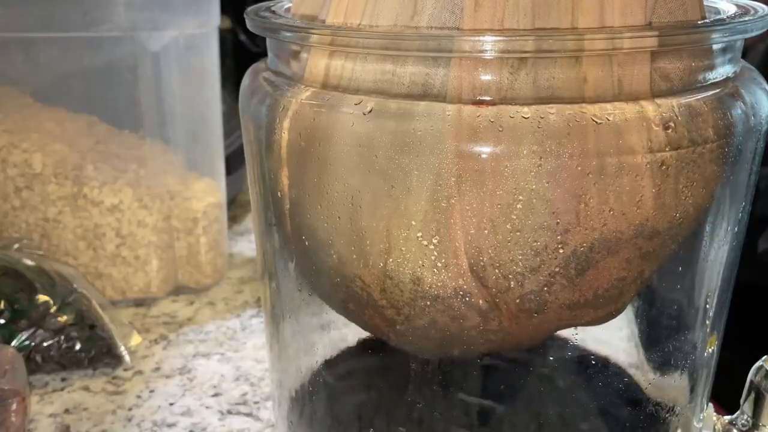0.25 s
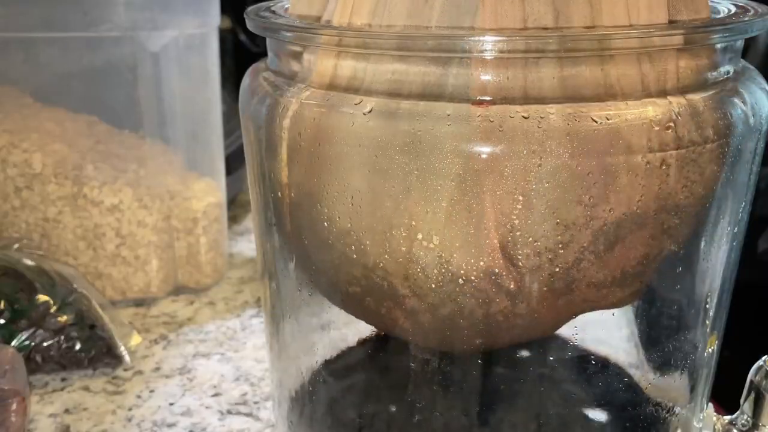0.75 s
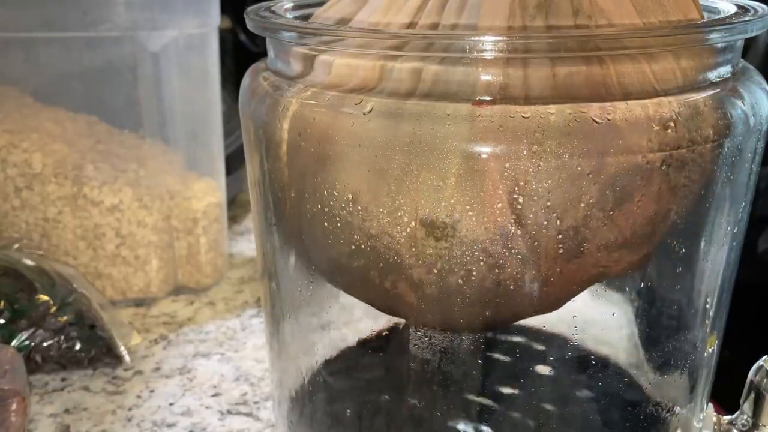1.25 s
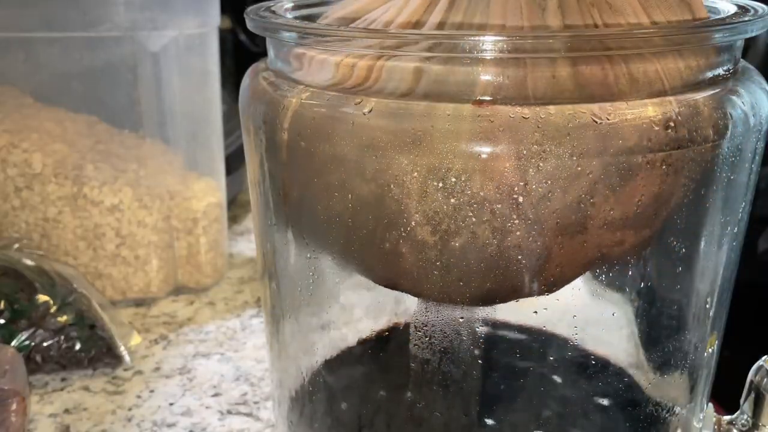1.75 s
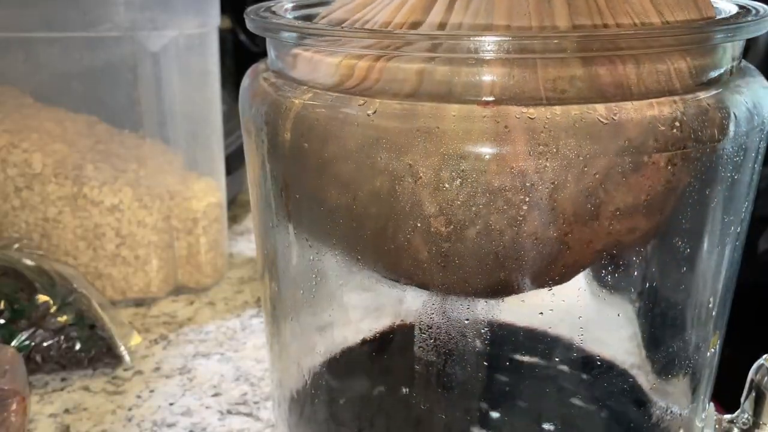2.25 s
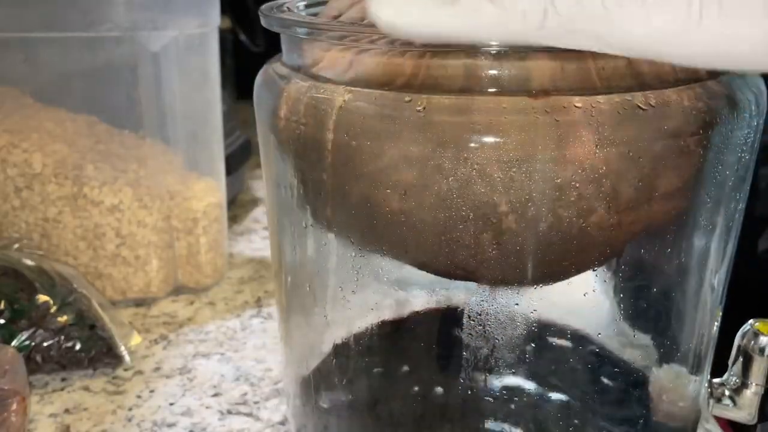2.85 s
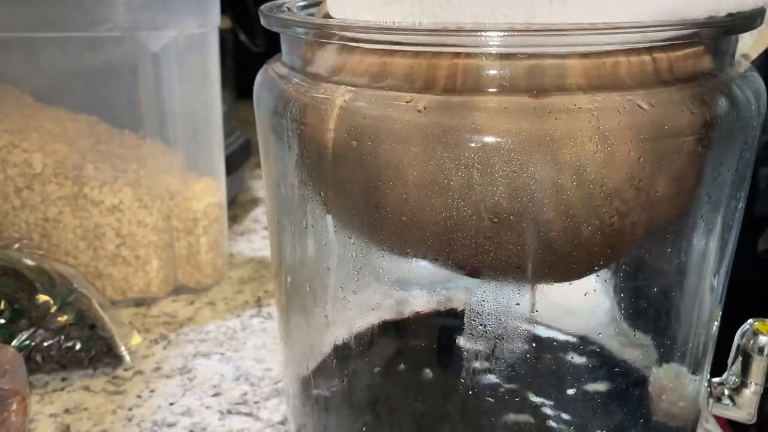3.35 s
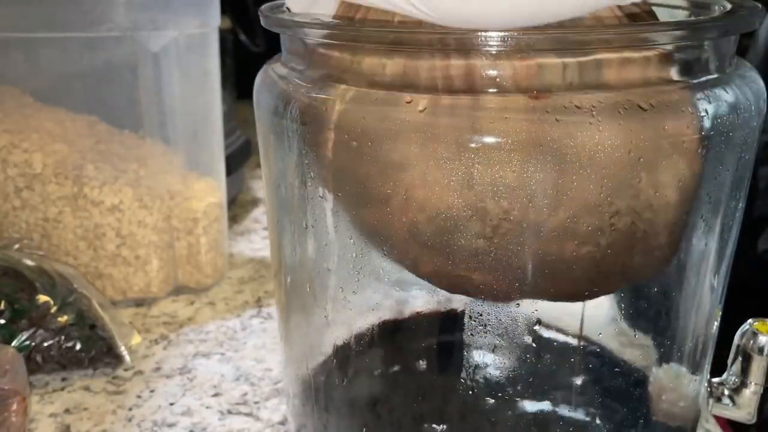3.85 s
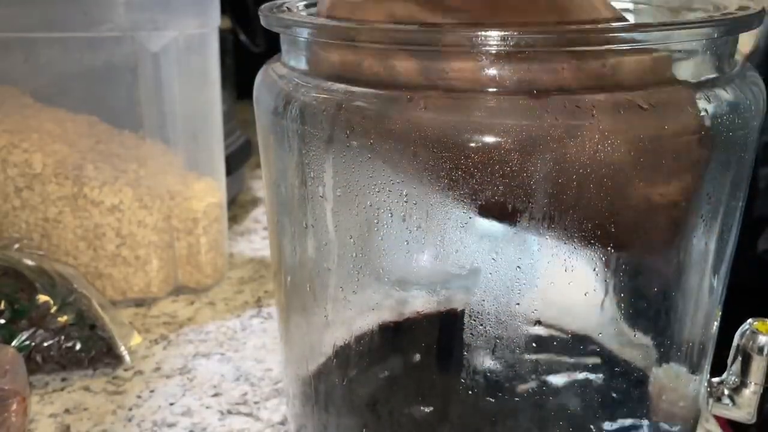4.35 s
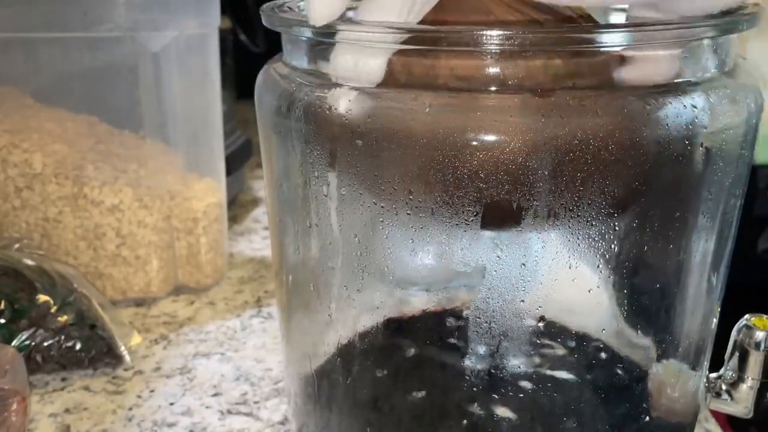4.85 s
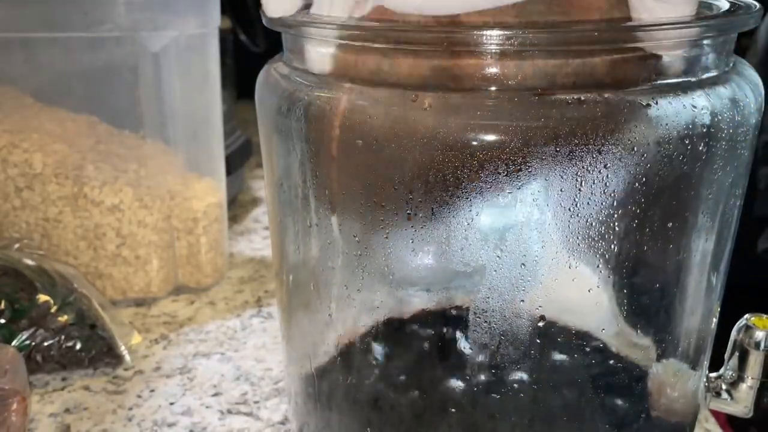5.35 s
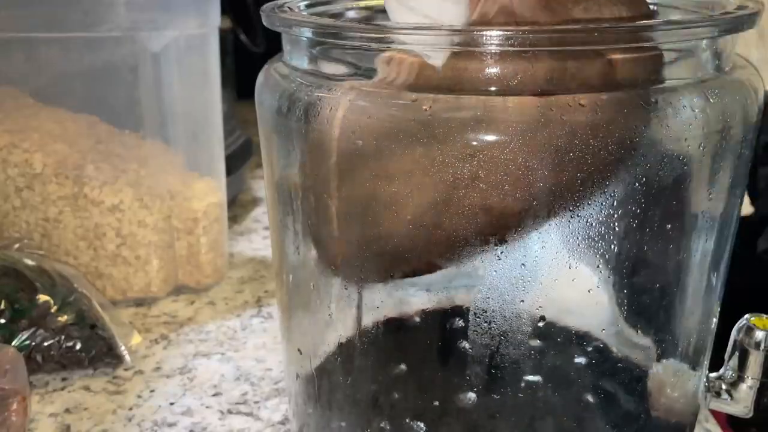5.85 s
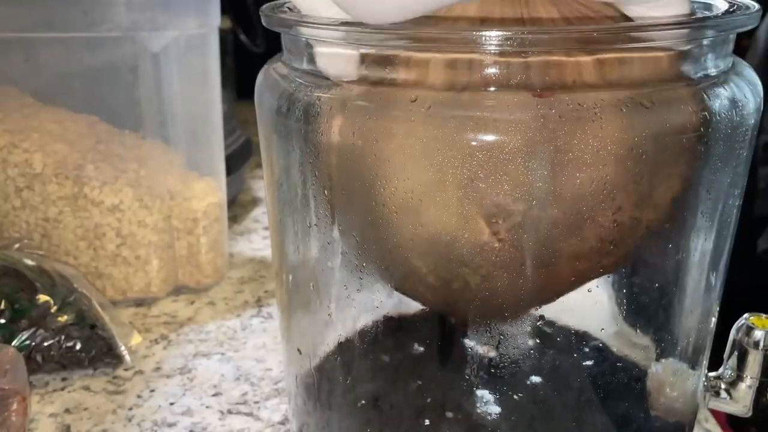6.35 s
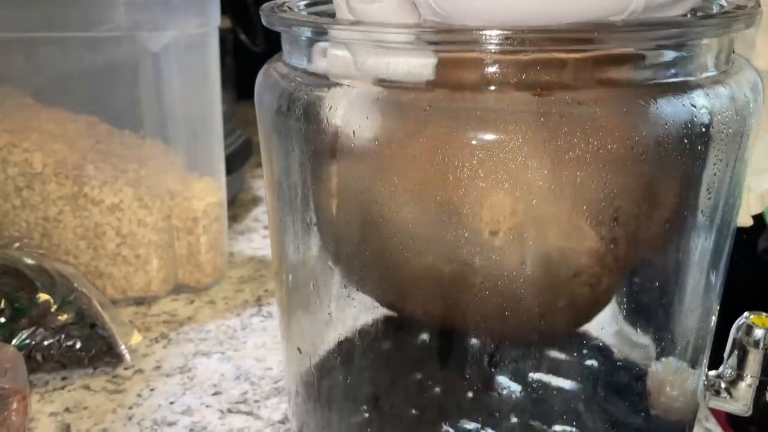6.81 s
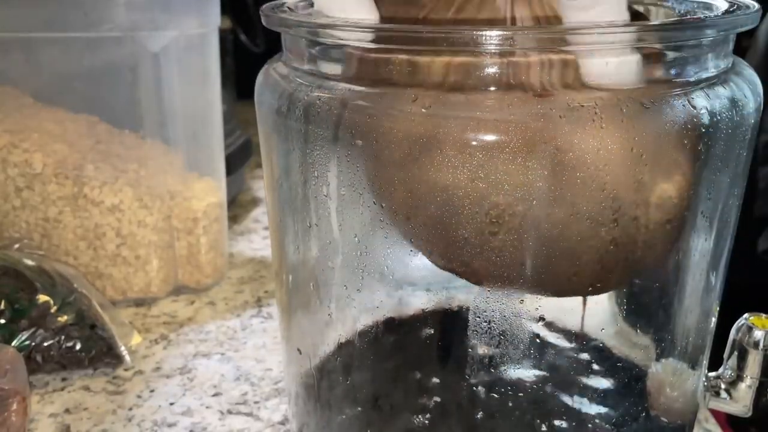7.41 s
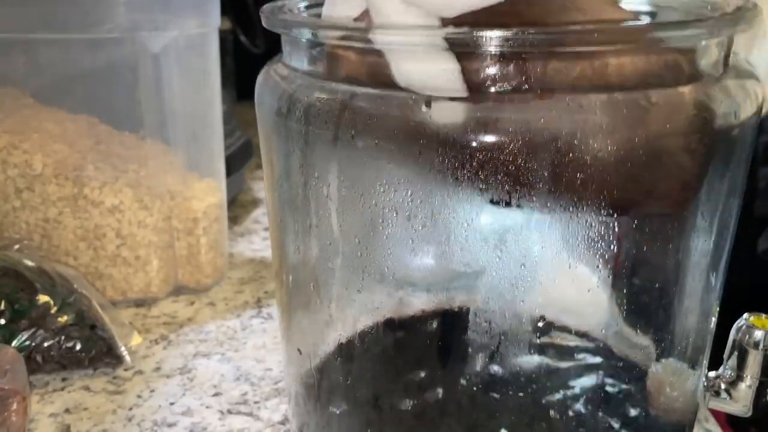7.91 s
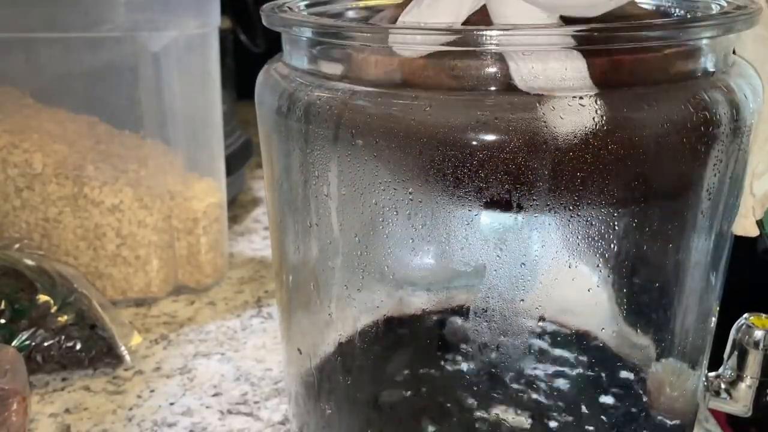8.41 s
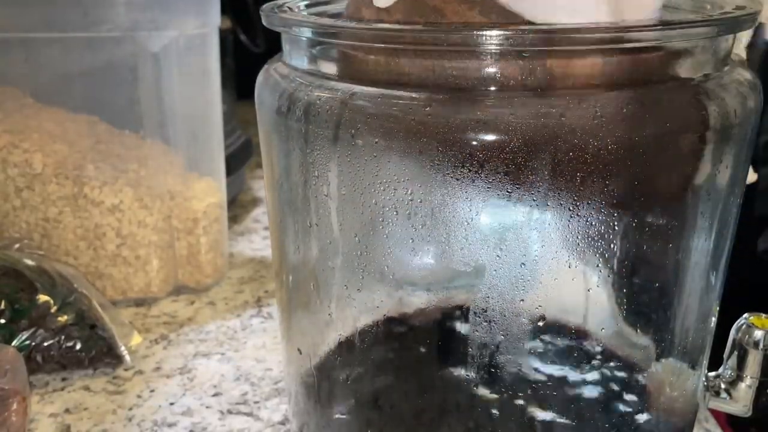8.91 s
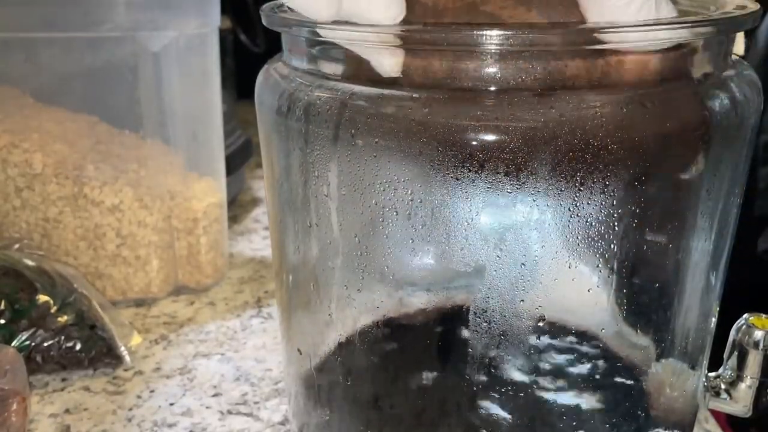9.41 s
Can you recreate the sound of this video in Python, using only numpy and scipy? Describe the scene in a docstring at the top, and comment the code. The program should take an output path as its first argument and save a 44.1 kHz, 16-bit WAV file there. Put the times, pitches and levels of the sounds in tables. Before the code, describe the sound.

Over a low, faint room hum, watery drops ring with short hollow plips inside a jar. A hard knock with a gritty rattle comes early and is by far the loudest event. Light dripping follows, then busier trickling as gloved hands handle the wet bag, with dry rustles, little crackling snaps and dull low thumps, heard close up in a small kitchen.

```python
"""Drops fall from a wet filter bag, lifted and turned by gloved hands in the neck of a glass jar.
They sound in the pool below as ringing sines, higher companion tones and high splats, each with tick and spray.
Small drops splat and fizz, and the jar's air rings after them. The jar knocks once on the counter as clicked
modes; cloth and gloves rustle and snap in filtered noise, hands bump the jar in sagging low sines, and
noise bands and soft hums make a quiet kitchen."""
import sys
import numpy as np
from scipy import signal
from scipy.io import wavfile

SR = 44100
rng = np.random.default_rng(int(sys.argv[2]) if len(sys.argv) > 2 else 0)


def transcribe(u):
    """Save the signal u as a 16-bit wav file named by the first command-line argument.

    u: samples, shape (n,) or (channels, n), limited to [-1, 1]; the rate is SR.
    q: integer samples, one column per channel.
    """
    v = np.clip(np.atleast_2d(u).T, -1, 1)
    q = np.round(v * 32767).astype(np.int16)
    wavfile.write(sys.argv[1], SR, q)


N = 426447

# In all tables and settings, t60 is the time in seconds for a sound to fade by 60 dB.
# kitchen noise by pitch, only its shape matters: f/Hz, level per Hz/dB
ROOM_SPECTRUM = [(20, -26), (40, -7.5), (65, -3), (134, -1.5), (220, -6.5), (300, -13), (450, -21),
                 (520, -25.5), (800, -31), (1200, -32.5), (2000, -43)]
# low rumble of handling, carried by the counter: t/s, level/dB
RUMBLE_LEVELS = [(0, -62.5), (3.2, -63), (3.69, -58.5), (5.01, -65), (6.6, -56.5), (6.97, -56),
                 (8.81, -65.5), (9.67, -64.5)]
# narrow hums of the kitchen: f/Hz, width/Hz, level/dB
KITCHEN_HUMS = [(416, 32, -70), (800, 94, -78.5)]
# ringing drops, their higher companion tones and high splats: t/s, level/dB, f/Hz,
# t60/s (at least 0.008 s is used)
DROP_TONES = [(0.026, -62.5, 1830, 0.011), (0.096, -61, 1435, .035), (.316, -59.5, 1870, 0.016),
              (.325, -73, 3200, 0.098), (0.693, -52, 1300, 0.061), (0.868, -55.5, 1980, 0.026),
              (.988, -47, 1980, 0.033), (1.087, -63, 1900, .033), (1.129, -66, 1800, 0.035),
              (1.227, -55.5, 2578, 0.022), (1.404, -58.5, 1106, 0.11), (1.512, -57.5, 1830, 0.033),
              (1.54, -44, 1570, 0.17), (1.566, -57, 1280, 0.041), (1.762, -61, 1100, 0.06),
              (1.811, -64.5, 1772, 0.19), (1.886, -56.5, 1080, 0.048), (2.033, -49.5, 1315, .062),
              (2.035, -52.5, 1850, .03), (2.113, -50.5, 1724, .027), (2.143, -57.5, 1910, 0.026),
              (2.215, -42, 1180, 0.0072), (2.213, -53, 3500, .02), (2.238, -54.5, 920, .044),
              (2.354, -55, 4140, 0.022), (2.458, -45, 1076, 0.091), (2.515, -45.5, 1570, 0.022),
              (2.602, -56, 1860, 0.018), (2.675, -53, 1810, 0.015), (2.703, -54.5, 4660, .02),
              (2.839, -60, 1830, 0.018), (2.875, -60.5, 3150, .03), (3.077, -47.5, 1460, 0.028),
              (3.136, -57, 4740, 0.024), (3.174, -55, 2530, 0.0072), (3.238, -46, 720, 0.056),
              (3.243, -56, 4030, .02), (3.311, -51.5, 1050, 0.019), (3.355, -49.5, 1120, 0.052),
              (3.439, -44, 1450, 0.083), (3.509, -53, 1610, 0.11), (3.61, -63.5, 1786, 0.035),
              (3.872, -54, 3110, 0.037), (3.927, -46, 2560, 0.011), (4.057, -58, 2000, 0.011),
              (4.333, -47, 1480, 0.011), (4.489, -53, 3600, 0.037), (4.561, -53, 2600, 0.028),
              (4.684, -46, 1645, 0.045), (4.737, -48, 1646, .054), (4.746, -48, 1230, 0.033),
              (4.764, -44.5, 930, 0.091), (4.824, -47, 2190, 0.018), (4.825, -43.5, 1610, 0.064),
              (4.86, -38.5, 2540, 0.0075), (4.879, -44.5, 1627, .12), (4.908, -45, 930, 0.015),
              (5.018, -47, 1660, 0.024), (5.031, -50.5, 1830, 0.012), (5.048, -51, 3800, 0.017),
              (5.06, -49, 2640, 0.054), (5.061, -51, 3070, 0.088), (5.106, -49, 1530, 0.038),
              (5.163, -38, 876, 0.02), (5.166, -50.5, 1940, 0.033), (5.216, -56.5, 1060, .033),
              (5.329, -55, 1610, 0.018), (5.349, -39.5, 2000, 0.0084), (5.361, -51, 4400, .015),
              (5.424, -60.5, 1930, .03), (5.457, -58, 3096, 0.076), (5.47, -46.5, 1670, .061),
              (5.557, -55, 1880, 0.028), (5.686, -63, 3930, .02), (5.691, -53, 1600, .03),
              (5.719, -63, 5200, 0.034), (5.747, -47.5, 1170, 0.065), (5.777, -55, 1050, 0.047),
              (5.9, -54.5, 770, 0.11), (6.006, -46, 1490, .031), (6.032, -41.5, 1680, 0.064),
              (6.094, -36.5, 1534, 0.073), (6.118, -48, 1080, 0.093), (6.24, -47.5, 1187, 0.056),
              (6.516, -47.5, 1175, .052), (6.582, -47, 5000, 0.05), (6.644, -58, 1840, 0.022),
              (6.701, -44, 1310, 0.016), (6.756, -45.5, 1475, 0.038), (6.794, -52, 1150, 0.019),
              (6.824, -51, 1830, 0.021), (6.897, -43.5, 3440, 0.037), (6.91, -46, 800, 0.011),
              (6.993, -52, 870, .012), (7.025, -53, 3190, .02), (7.058, -40, 900, 0.0074),
              (7.096, -50, 800, .25), (7.179, -55, 1210, 0.076), (7.26, -66, 1700, 0.026),
              (7.343, -58, 1830, 0.024), (7.417, -59, 1830, .012), (7.572, -59, 2010, 0.037),
              (7.67, -57.5, 1760, .04), (7.963, -46, 1340, .012), (8.01, -49, 830, .028),
              (8.029, -55, 850, 0.042), (8.047, -47.5, 2680, 0.04), (8.101, -50.5, 1856, 0.039),
              (8.1, -42, 3030, 0.022), (8.112, -42, 4360, .015), (8.121, -46, 5140, .015),
              (8.125, -48, 845, 0.088), (8.17, -39.5, 870, 0.038), (8.177, -47.5, 3540, .02),
              (8.206, -36, 1514, .04), (8.221, -58, 1033, .14), (8.274, -35, 900, 0.0092),
              (8.303, -48.5, 930, 0.13), (8.329, -42, 893, 0.024), (8.388, -43.5, 893, 0.026),
              (8.411, -38.5, 950, 0.06), (8.44, -46, 1060, 0.019), (8.466, -50.5, 1054, 0.066),
              (8.489, -35, 1535, 0.028), (8.537, -37, 1007, 0.024), (8.602, -45, 1680, .049),
              (8.608, -38, 870, 0.016), (8.68, -40.5, 1560, 0.017), (8.694, -50, 2900, .02),
              (8.703, -50.5, 735, 0.056), (8.78, -42, 1670, 0.048), (8.795, -51, 976, 0.043),
              (8.834, -50, 4400, 0.023), (8.84, -68.5, 1800, .05), (8.962, -36.5, 1506, 0.034),
              (9.067, -54, 1680, .03), (9.113, -44, 1830, 0.007), (9.191, -47, 2095, 0.029),
              (9.238, -48, 1440, 0.025), (9.335, -47.5, 1110, 0.033), (9.337, -46, 3140, 0.012),
              (9.494, -61.5, 1830, 0.033), (9.576, -57, 1326, .12), (9.598, -48, 1690, 0.12)]
# resonances of the air in the jar: f/Hz, level relative to JAR_AIR_DB/dB, t60/s
JAR_RESONANCES = [(887.4, -4.5, 0.047), (1050, -5.5, 0.04), (1427, -10, 0.047), (1830, 3, 0.045),
                  (2530, -6.5, 0.071), (3140, -13.5, 0.093), (4230, -16, 0.1), (4540, -25, 0.047)]
# contacts as the jar rocks down on the counter: t/s, blow level/dB, low-pass f/Hz
KNOCK_CONTACTS = [(0.439, -21.5, 1800), (0.4446, -27, 2070), (0.454, -22, 2540), (.4650, -18.5, 3470),
                  (0.469, -17, 1800), (0.475, -19.5, 1160), (.4880, -28, 2260), (0.52, -41, 1210)]
# ringing modes of counter and jar glass: f/Hz, middle level relative to the blow/dB, t60/s
BODY_MODES = [(99, -26, 0.12), (151.3, -20.5, 0.53), (181.4, -4.5, 0.077), (235, -7.5, 0.14),
              (395.3, 1.5, 0.071), (515, -2.5, 0.02), (582, -1.5, 0.07), (605, 2, 0.031),
              (771, -6.5, 0.038), (930, -12.5, .07), (1115, -9.5, 0.092), (1383, -7.5, 0.056),
              (1680, -1.5, 0.021), (1980, -15, 0.0097), (2247, -36, 0.026), (2850, -11, 0.056),
              (3060, -8.5, 0.0091), (3600, -34, 0.042), (4950, -15, 0.058), (6150, -29, 0.038),
              (7900, -22.5, 0.04)]
# strokes of glove and cloth along the rim: start t/s, length/s, dry hiss level/dB, wet scuff level/dB
RUB_STROKES = [(0.546, 0.12, -66.5, -69.5), (0.722, 0.36, -61.5, -74.5), (0.804, 0.11, -56.5, -76),
               (1.115, .42, -73.5, -77), (1.698, 0.083, -74, -82), (1.784, 0.12, -71.5, -70),
               (1.914, .36, -64.5, -67), (2.098, 0.044, -54, -63), (2.328, 0.027, -61.5, -81),
               (2.476, .1, -56.5, -59), (2.606, 0.12, -67.5, -66), (2.742, 0.13, -67.5, -66),
               (2.908, .2, -82, -79), (3.077, 0.19, -71, -75.5), (3.262, 0.026, -54, -63),
               (3.335, .06, -64.5, -65), (3.545, 0.1, -65, -69), (3.734, 0.056, -73.5, -94),
               (3.874, 0.057, -74, -79), (4.012, 0.13, -63.5, -70), (4.21, .35, -67, -77),
               (4.326, 0.02, -54.5, -65), (4.509, 0.016, -56, -77), (4.62, 0.15, -75, -68),
               (4.825, 0.091, -76, -66), (4.942, 0.27, -64, -70), (5.264, 0.019, -55, -69),
               (5.331, 0.021, -65.5, -61.5), (5.395, 0.014, -60.5, -72), (5.47, 0.093, -69, -69.5),
               (5.534, 0.46, -72.5, -73), (5.895, 0.28, -71.5, -87), (6.228, 0.038, -73, -74),
               (6.36, 0.034, -78, -68), (6.547, 0.14, -67, -64), (6.773, 0.12, -68, -63),
               (6.946, 0.1, -63.5, -64.5), (7.046, 0.22, -72.5, -74), (7.195, 0.057, -67, -84),
               (7.354, 0.13, -67, -70), (7.68, 0.012, -70, -83), (7.758, 0.1, -70.5, -72),
               (7.895, 0.14, -64.5, -62), (8.068, 0.22, -59.5, -62), (8.293, 0.13, -64.5, -68),
               (8.469, 0.092, -59.5, -67), (8.617, 0.016, -53.5, -56), (8.682, 0.025, -55, -65),
               (8.763, 0.044, -62, -67), (8.81, 0.22, -65, -72.5), (9.041, 0.034, -56, -67),
               (9.198, 0.043, -65, -74), (9.286, 0.059, -61.5, -67.5), (9.449, 0.02, -63, -81),
               (9.53, 0.063, -70.5, -68), (9.617, 0.026, -68, -78)]
# dry hiss and duller wet scuff by pitch, only the shape matters: f/Hz, level per Hz/dB
DRY_SPECTRUM = [(900, -60), (2500, -7), (4800, -9), (6200, -13), (8500, -10), (11500, -2.5), (13500, -11),
                (16500, -44)]
WET_SPECTRUM = [(300, -4), (800, 13.5), (1800, 17.5), (3000, -35.5), (5000, 2), (6500, -26), (10000, -32)]
# colours shared out among the rubbing ticks: f/Hz
TICK_COLOURS = [4780, 7560, 8400, 10000, 11200]
# flow of small drops, none where it is below zero: t/s, drops per s
DROP_FLOW = [(.5, -8), (1.5, 16), (3, 38.5), (3.9, 6), (4.6, 48), (6.4, 39.5), (7.7, 42), (8.2, 85),
             (8.9, 73.5), (9.67, 35)]
# glove and cloth snapping on the rim: t/s, level/dB, slap level relative to that/dB,
# hiss level relative to that before it is halved/dB, hiss centre f/Hz
RIM_SNAPS = [(1.323, -44.5, -32, -17, 8900), (1.8011, -51, -24, 6.5, 8700), (2.355, -59.5, -25, -2.5, 4500),
             (2.617, -46.5, -7, 3.5, 10700), (2.7511, -54, -1, 6.5, 9700), (4.2026, -35, -22, -17, 7200),
             (4.2376, -48, -22, -2, 8110), (4.679, -58, 0, 4.5, 6900), (4.816, -57, -9, 9, 9200),
             (4.858, -42, -28, -11, 4640), (5.4582, -47, -10, -2.5, 9800), (5.509, -54.5, -14, 10, 12400),
             (6.0113, -53, 4, 12.5, 10500), (6.235, -55.5, -14, 2, 8500), (6.5657, -32.5, -1.5, -10, 5040),
             (6.6147, -33.5, -3, -5.5, 10900), (6.669, -23, -5, -17.5, 5730),
             (6.847, -24.5, -10, -17, 4030), (7.0936, -38.5, -10, -10, 4100),
             (7.4647, -37, -5.5, -22, 10800), (7.4932, -39, -20, -7, 8350), (7.6923, -42, -26, -9, 11800),
             (7.7204, -26, -8.5, -16.5, 10900), (7.9215, -56, -8, 1, 4250),
             (7.9395, -25.5, -5.5, -17, 4100), (8.268, -47, 6.5, 9, 6760), (8.441, -46, -25, -3, 5400),
             (8.7748, -49, -21, -0.5, 10000), (8.9137, -51.5, -25, 4.5, 6560), (8.9732, -46, -31, 2, 7600),
             (9.171, -57, -14, 6, 4160), (9.332, -37.5, -22, -11, 4870), (9.4048, -30, -5, -10, 10900),
             (9.6337, -56, -23, 5, 6400)]
# hands bumping jar and counter: t/s, level/dB, base f/Hz (see BUMP_END), tap level relative to the thud/dB
HAND_BUMPS = [(2.508, -40.5, 130, -.5), (2.535, -44, 128, -6), (3.65, -35, 103.3, -7.5),
              (3.773, -35, 96, -13), (4.152, -43, 117, -6.5), (4.421, -41, 183, -5.5),
              (4.471, -29.5, 109.6, -10), (4.903, -43, 167, -7), (5.124, -52.5, 103, 8),
              (5.398, -41.5, 170, -5), (5.76, -50, 123, 0), (5.936, -34.5, 70.4, -7.5),
              (6.657, -38.5, 105, -11), (6.716, -44.5, 166, 5), (6.832, -41, 92, -0.5),
              (6.932, -45, 88, 1.5), (7.149, -41.5, 85, 0), (7.571, -40.5, 152.6, -8.5),
              (7.702, -49, 166, -1.5), (7.921, -39, 75, -1.5), (8.078, -45.5, 55.3, 2),
              (8.272, -51.5, 244, 5), (9.054, -38.5, 94, 0.5), (9.392, -42.5, 109, 0.5)]

ROOM_DB, ROOM_PATCHY_DB = -58, 1.5
AIR_HISS_DB, AIR_HISS_HZ = -88.5, 9200  # faint airy floor
TONE_SWELL_S = 0.0024  # time for a drop tone or fizz ping to reach full strength
TONE_RISE = 0.046  # share of pitch gained per t60
TONE_ROUGH, ROUGH_HZ = 0.23, 130  # the rippled surface shakes each tone's level by this share
TICK_OF_DROP_DB, TICK_OF_DROP_S = -11.5, 0.0017  # the drop hitting the surface
SPRAY_DB, SPRAY_S, SPRAY_HZ = -4.5, 0.0036, 4550  # spray thrown up by the drop
JAR_AIR_DB, JAR_WAVER_DB = -29.5, 2.5  # the moving pool keeps reshaping the air space
ECHO_DB, ECHO_T60_S, ECHO_HZ = -2.5, 0.32, 655  # the kitchen's answer to the knock
GRIT_DB, GRIT_S, GRIT_HZ = -4.5, 0.0086, 1800  # grit crushed under the rim at each contact
STROKE_ATTACK_S, STROKE_RELEASE_S = 0.017, 0.02
TOUCH_S, TOUCH_DB = 0.545, -80  # from here on the wet bag never quite stops creeping
RUB_PATCHY_DB, RUB_TOP_HZ = 3, 13650
TICKS_PER_S, TICK_DB, TICK_S = 90, 7, 0.005  # fibres and wet films letting go; weakest level, fade time
TRICKLE_DB, TRICKLE_SPREAD_DB, TRICKLE_T60_S = -61.5, 1.5, 0.026
FIZZ_DB, FIZZ_SPREAD_DB, FIZZ_PER_DROP = -65, 3.5, 1.5
FIZZ_LOW_HZ, FIZZ_RANGE = 2600, 2.6  # lowest pitch, highest over lowest
FIZZ_CYCLES = 49  # cycles in which a ping fades by 60 dB
CRACK_S, CRACK_HZ = 0.0006, 6850
SNAP_HISS_T60_S = 0.082
SLAP_HZ, SLAP_T60_S = 388, 0.046
BUMP_T60_S, BUMP_TAP_HZ = 0.21, 304  # a bump starts with a duller tap
BUMP_END, BUMP_SAG, BUMP_SAG_S = 0.567, 0.76, 0.0355  # pitch over base f: last value, extra at the start
CUTOFF_HZ = 16500


def from_db(db):
    """Turn dB into gain."""
    return 10 ** (np.asarray(db) / 20)


def fade(t, t60):
    """Fade evenly in dB, by 60 dB in t60 seconds."""
    return from_db(-60 * t / t60)


def rms_one(x):
    """Scale to an average strength (rms) of 1."""
    return x / np.sqrt(np.mean(x ** 2) + 1e-20)


def add(out, s, sound):
    """Mix a short sound in at time s."""
    i = int(s * SR)
    out[i:i + len(sound)] += sound[:N - i]


def drift(rate):
    """Slow random wander of spread 1, about as fast as rate in Hz."""
    # made at every 40th sample, then joined by straight lines
    r = np.exp(-80 * np.pi * rate / SR)
    slow = signal.lfilter([1], [1, -2 * r, r * r], rng.standard_normal(N // 40 + 2002))[2000:]
    return np.interp(np.arange(N) / 40, np.arange(len(slow)), rms_one(slow))


def ring(x, hz, t60):
    """A resonance: a unit click sets a sine of height 1 ringing."""
    r = from_db(-60 / (t60 * SR))  # loss per sample
    w = 2 * np.pi * hz / SR
    return signal.lfilter([0, np.sin(w)], [1, -2 * r * np.cos(w), r * r], x + 1e-18)


def low_pass(x, hz):
    """Weaken what lies above hz, with two poles."""
    return signal.lfilter(*signal.butter(2, min(hz, 20000), fs=SR), x)


def band_pass(x, hz, octaves):
    """Keep a band of the given width around hz, cut off at 19 kHz."""
    low, high = hz * 2 ** (-octaves / 2), min(hz * 2 ** (octaves / 2), 19000)
    return signal.lfilter(*signal.butter(1, [low, high], "band", fs=SR), x)


def coloured(spectrum, patchy_db, rate):
    """Half-octave bands of noise, each flickering partly alone, partly with the rest; rms 1."""
    hz, level_db = np.transpose(spectrum)
    out, together, white = 0, drift(rate), rng.standard_normal((2, N))
    edges = hz[0] * 2 ** np.arange(0, np.log2(min(hz[-1], 16000) / hz[0]) + .5, .5)
    for k, (low, high) in enumerate(zip(edges, edges[1:])):
        sos = signal.butter(2, [low, min(high, 20000)], "band", fs=SR, output="sos")
        noise = signal.sosfilt(sos, white[k % 2])  # neighbours use different noise
        band_db = np.interp(np.log(low * high) / 2, np.log(hz), level_db)
        flicker = together + drift(rate) + drift(rate / 5)
        out = out + noise * from_db(band_db + patchy_db * flicker)
    return rms_one(out)


def kitchen():
    """Broad room noise, a swelling low rumble, a faint hiss and two soft hums."""
    out = from_db(ROOM_DB) * coloured(ROOM_SPECTRUM, ROOM_PATCHY_DB, rate=8.7)
    s, db = np.transpose(RUMBLE_LEVELS)
    rumble = signal.lfilter(*signal.butter(2, [35, 90], "band", fs=SR), rng.standard_normal(N))
    out += from_db(np.interp(np.arange(N) / SR, s, db)) * rms_one(rumble)
    hiss = band_pass(rng.standard_normal(N), AIR_HISS_HZ, octaves=3.1)
    out += from_db(AIR_HISS_DB) * rms_one(band_pass(hiss, AIR_HISS_HZ, octaves=3.1))
    for hz, width, level_db in KITCHEN_HUMS:
        t60 = np.log(1000) / (np.pi * width)  # a narrow resonance rings long
        out += from_db(level_db) * rms_one(ring(rng.standard_normal(N), hz, t60))
    return out


def drop_tone(level_db, hz, t60, noise):
    """A tick and spray, then a sine that swells, wavers, climbs a little and dies."""
    t = np.arange(len(noise)) / SR
    swell = np.sin(np.pi / 2 * np.minimum(t / TONE_SWELL_S, 1)) ** 2
    shape = swell * fade(np.maximum(t - TONE_SWELL_S, 0), t60)
    # the noise runs backwards here, so the shaking does not follow the tick
    shape = shape * (1 + TONE_ROUGH * rms_one(low_pass(noise[::-1], ROUGH_HZ)))
    tone = np.sin(2 * np.pi * hz * (t + TONE_RISE * t ** 2 / (2 * t60)))
    tick = low_pass(low_pass(noise, 3.3 * hz), 3.3 * hz)
    tick = tick * (t / TICK_OF_DROP_S) * np.exp(-t / TICK_OF_DROP_S)
    spray = low_pass(band_pass(noise, SPRAY_HZ / 2, octaves=11.6), SPRAY_HZ)
    spray = spray * (t / SPRAY_S) * np.exp(-t / SPRAY_S)
    return from_db(level_db) * (shape * tone + from_db(TICK_OF_DROP_DB) * tick + from_db(SPRAY_DB) * spray)


def drips():
    """Ringing drops, their higher companion tones and high splats, each at its own pitch."""
    out = np.zeros(N)
    for s, db, hz, t60 in DROP_TONES:
        add(out, s, drop_tone(db, hz, max(t60, .008), rng.standard_normal(SR // 6)))
    return out


def jar(x):
    """The air between pool and bag rings on, unsteadily, after whatever sounds in it."""
    out = np.zeros(N)
    for k, (hz, db, t60) in enumerate(JAR_RESONANCES):
        gain = from_db(JAR_AIR_DB + db + JAR_WAVER_DB * drift(77))
        out += (-1) ** k * gain * ring(x, hz, t60)  # every other one is turned over
    return out


def knock():
    """Each contact is a soft click into every mode, with strengths of its own, plus grit and a dull echo."""
    out, length = np.zeros(N), SR // 2
    t = np.arange(length) / SR
    for s, db, contact_hz in KNOCK_CONTACTS:
        click = low_pass(t == 0, contact_hz) * from_db(db)
        chance_db = rng.normal(0, 2, len(BODY_MODES))
        sound = np.zeros(length)
        for k, (hz, mode_db, t60) in enumerate(BODY_MODES):
            sound += (-1) ** k * from_db(mode_db + chance_db[k]) * ring(click, hz, t60)
        echo = low_pass(low_pass(rng.standard_normal(length), ECHO_HZ), 2.5 * ECHO_HZ)
        echo = echo * fade(t, ECHO_T60_S) * np.minimum(t / 0.013, 1)
        grit = low_pass(low_pass(rng.standard_normal(length), GRIT_HZ), 4.8 * GRIT_HZ)
        grit = grit * np.exp(-t / GRIT_S)
        add(out, s, sound + from_db(db + ECHO_DB) * echo + from_db(db + GRIT_DB) * grit)
    # keep the knock free of offset and of sound below 60 Hz
    return signal.lfilter(*signal.butter(2, 60, "high", fs=SR), out)


def strokes(column):
    """Gain of one rubbing layer: each stroke rises, holds and fades; powers add."""
    t = np.arange(N) / SR
    power = from_db(2 * TOUCH_DB) * (t > TOUCH_S)
    for s, length, *db in RUB_STROKES:
        u = np.arange(int((length + 8 * STROKE_RELEASE_S) * SR)) / SR
        rise = np.minimum(u / STROKE_ATTACK_S, 1)
        shape = rise * np.exp(-np.maximum(u - length, 0) / STROKE_RELEASE_S)
        add(power, s, (from_db(db[column]) * shape) ** 2)
    return np.sqrt(power)


def rubbing():
    """Fibres hiss brightly and tick; the wet cloth adds a duller layer."""
    tick_db = TICK_DB + 2.26 * np.minimum(rng.exponential(1, N), 4)
    ticks = (rng.random(N) < TICKS_PER_S / SR) * from_db(tick_db)
    colour = rng.integers(0, len(TICK_COLOURS), N)  # each tick is dealt one colour
    hiss = coloured(DRY_SPECTRUM, RUB_PATCHY_DB, rate=70)
    for k, hz in enumerate(TICK_COLOURS):
        puffs = signal.lfilter([1], [1, -np.exp(-1 / (TICK_S * SR))], ticks * (colour == k) + 1e-18)
        tick_noise = band_pass(puffs * rng.standard_normal(N), hz, octaves=.8)
        hiss += band_pass(tick_noise, hz, octaves=.8)
    hiss = low_pass(low_pass(hiss, RUB_TOP_HZ), RUB_TOP_HZ)
    scuff = coloured(WET_SPECTRUM, RUB_PATCHY_DB, rate=110)
    return strokes(0) * hiss + strokes(1) * scuff


def flow(candidates, per_drop):
    """Chance time, size and pitch of small events, kept as often as the flow of drops allows."""
    s, per_s = np.transpose(DROP_FLOW)
    # keep is drawn between 0 and the number of candidates per second
    for when, size, pitch, keep in rng.random((candidates, 4)) * [N / SR, 1, 1, candidates * SR / N]:
        if keep < per_drop * np.interp(when, s, per_s):
            yield when, size, pitch


def trickle():
    """Small drops too weak to trap a bubble: short blurred splats of chance size, pitch and moment."""
    out, t = np.zeros(N), np.arange(SR // 20) / SR
    for when, size, pitch in flow(1000, per_drop=1):
        db = TRICKLE_DB - TRICKLE_SPREAD_DB * np.log(size + .05)
        hz = 1500 * 3.6 ** pitch
        noise = band_pass(rng.standard_normal(len(t)), hz, octaves=.15)
        splat = rms_one(band_pass(noise, hz, octaves=.3))
        add(out, when, from_db(db) * fade(t, TRICKLE_T60_S) * np.minimum(t / 0.0062, 1) * splat)
    return out


def fizz():
    """Tiny bubbles thrown up by the flow: brief high pings, the higher the shorter."""
    out, t = np.zeros(N), np.arange(SR // 25) / SR
    for when, size, pitch in flow(1500, FIZZ_PER_DROP):
        hz = FIZZ_LOW_HZ * FIZZ_RANGE ** (pitch ** 2)  # squaring favours low pitches
        db = FIZZ_DB - FIZZ_SPREAD_DB * np.log(size + .02)
        shape = np.minimum(t / TONE_SWELL_S, 1) * fade(t, FIZZ_CYCLES / hz)
        add(out, when, from_db(db) * shape * np.sin(2 * np.pi * hz * t))
    return out


def snaps():
    """A crack fading in under a millisecond, a short hissing tail, and a low slap of the bag."""
    out, t = np.zeros(N), np.arange(SR // 8) / SR
    for s, db, slap_db, hiss_db, hz in RIM_SNAPS:
        white = rng.standard_normal((3, len(t)))
        burst = np.sign(white[0]) * np.exp(-t / CRACK_S)
        crack = low_pass(band_pass(burst, CRACK_HZ, octaves=7.5), 15400)
        hiss = band_pass(band_pass(white[1], hz, octaves=0.56), hz, octaves=12.0)
        hiss = rms_one(low_pass(hiss, 19000)) * from_db(hiss_db) * fade(t, SNAP_HISS_T60_S)
        slap = rms_one(low_pass(band_pass(white[2], SLAP_HZ, octaves=0.7), 650))
        slap = slap * from_db(slap_db) * fade(t, SLAP_T60_S)
        add(out, s, from_db(db) * (crack + hiss / 2 + slap))
    return out


def bumps():
    """Low thuds that sag in pitch as they die, each with a dull tap of noise."""
    out, t = np.zeros(N), np.arange(SR // 3) / SR
    # running sum of the sagging pitch, for a base of 1 Hz
    cycles = BUMP_END * t + BUMP_SAG * BUMP_SAG_S * (1 - np.exp(-t / BUMP_SAG_S))
    for s, db, hz, tap_db in HAND_BUMPS:
        thud = np.sin(2 * np.pi * hz * cycles) * fade(t, BUMP_T60_S)
        tap = rms_one(low_pass(rng.standard_normal(len(t)), BUMP_TAP_HZ)) * np.exp(-t / 0.024)
        add(out, s, from_db(db) * np.minimum(t / 0.0048, 1) * (thud + from_db(tap_db) * tap))
    return out


def scene():
    """Drops and snaps sound inside the jar; the rest is around it."""
    inside = drips() + trickle() + fizz() + snaps()
    around = kitchen() + knock() + rubbing() + bumps()
    return (inside + jar(inside) + around)[None]


def record(dry):
    """Cut the top steeply: from CUTOFF_HZ up, all is at least 70 dB weaker."""
    return signal.sosfilt(signal.cheby2(12, 70, CUTOFF_HZ, fs=SR, output="sos"), dry)


dry = scene()
out = record(dry)
transcribe(out)
```